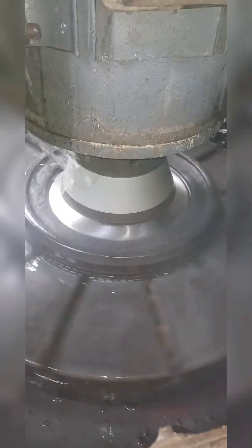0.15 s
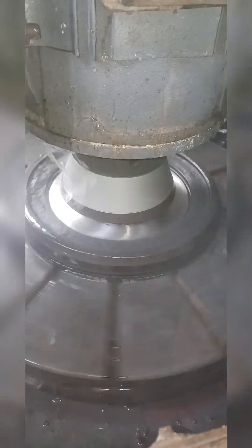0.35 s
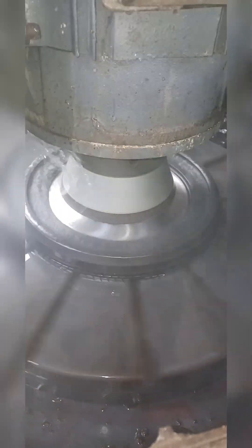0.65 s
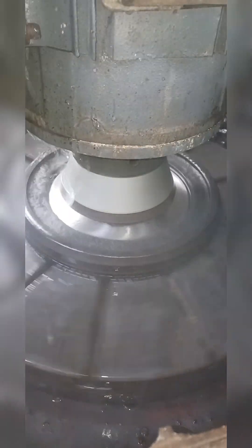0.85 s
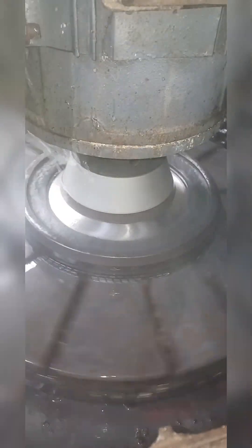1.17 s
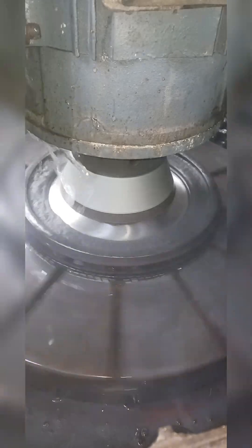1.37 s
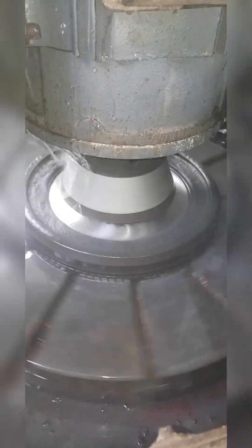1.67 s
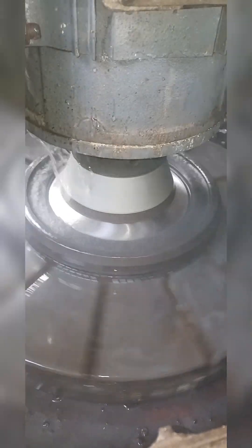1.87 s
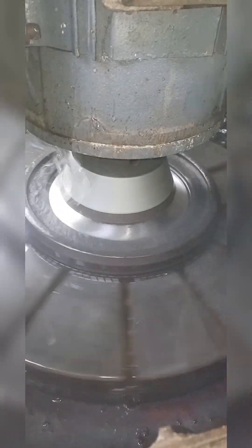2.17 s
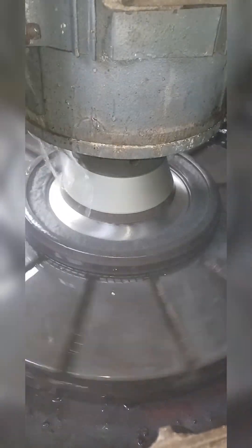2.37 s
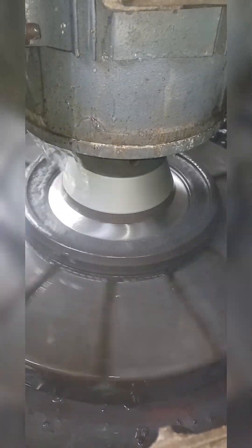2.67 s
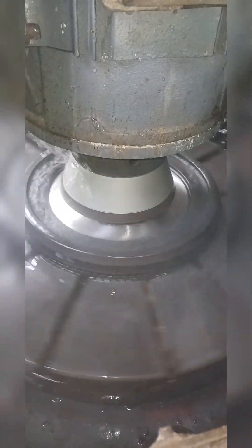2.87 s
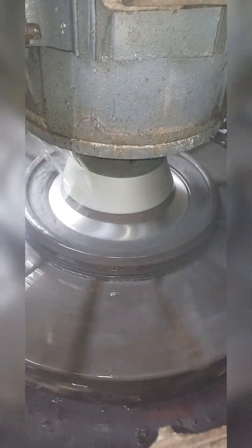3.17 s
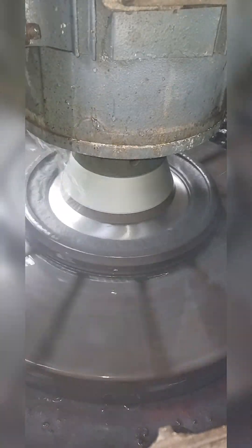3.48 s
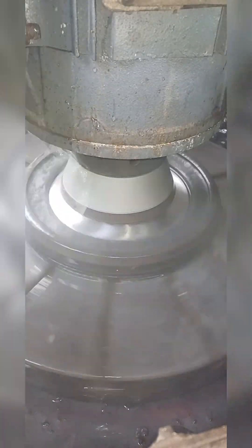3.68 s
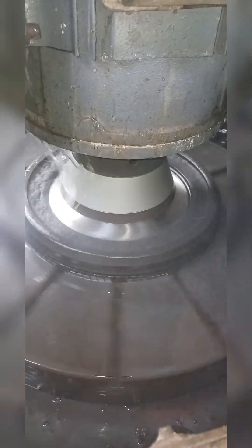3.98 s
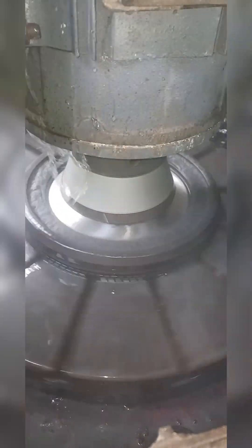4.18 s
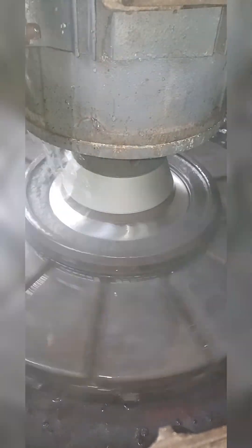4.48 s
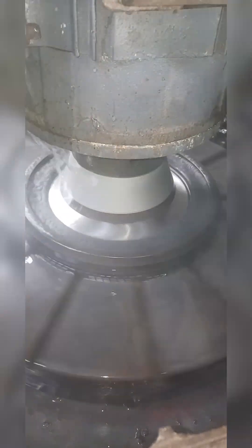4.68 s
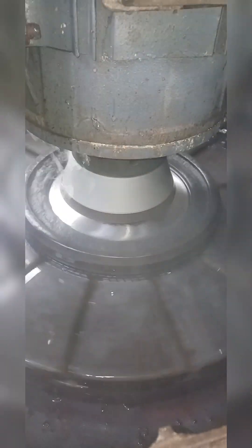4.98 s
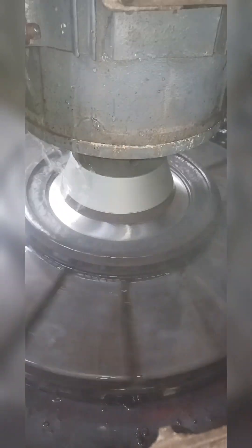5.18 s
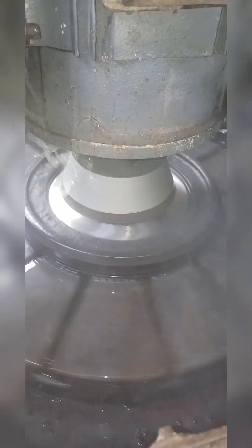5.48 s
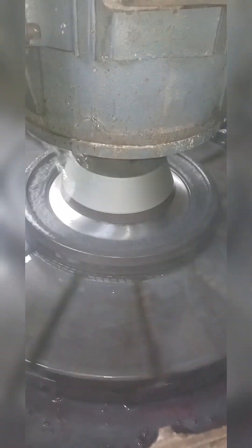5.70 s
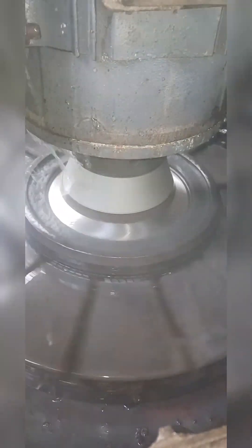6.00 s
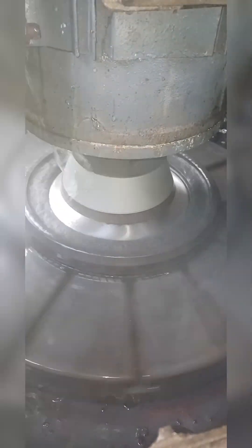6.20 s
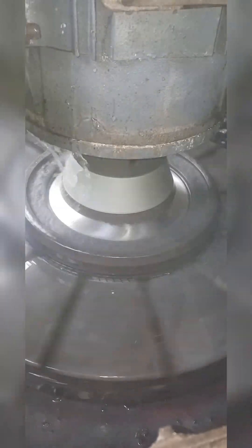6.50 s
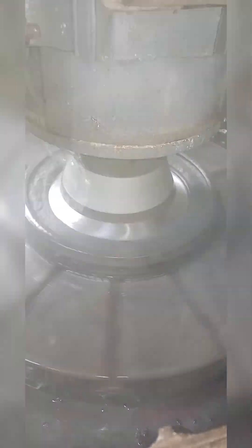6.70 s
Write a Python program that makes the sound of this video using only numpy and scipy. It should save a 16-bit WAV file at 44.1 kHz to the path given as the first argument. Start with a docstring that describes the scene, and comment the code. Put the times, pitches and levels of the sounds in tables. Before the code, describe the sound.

A grinding wheel squeals piercingly against a slowly turning metal flywheel, its high ring swelling every 0.7 seconds over wet rasping, rattle and motor thrum.

```python
"""A squealing cup wheel on a fast spindle wet-grinds a flywheel that turns slowly under it.
The wheel rings near 7 kHz: a pure swell once per table turn, a higher fluttering ring in between,
with hard bursts where it catches. Noise shaped by the bite makes the rasp, hiss and spray of wet iron.
A repeating noise pattern rattles the spindle head's resonances, and low spindle tones make the
motor's throbbing thrum."""
import sys
import numpy as np
from scipy import signal
from scipy.fft import rfft, irfft, next_fast_len
from scipy.io import wavfile
from scipy.ndimage import uniform_filter1d, map_coordinates

SR = 44100
rng = np.random.default_rng(int(sys.argv[2]) if len(sys.argv) > 2 else 0)


def wrap_up_sound(samples):
    """Save the sound to the file named by the first command line argument, as 16-bit audio."""
    columns = np.atleast_2d(samples).T
    # keep every value between -1 and 1, then stretch to whole-number steps
    tamed = np.clip(columns, -1, 1)
    steps = np.round(tamed * 32767).astype(np.int16)
    wavfile.write(sys.argv[1], SR, steps)


N = 302085  # length [samples]
SPIN_HZ = 59.1  # spindle turns per second
FREE_HZ = 7112  # the squeal's note under a light contact
SAG_HZ = 137.8  # how far the high spot pulls that note down

# the wheel's resonances: (centre [Hz], half-width [Hz], level [dB])
WHEEL = [(6985, 85, 0), (7145, 25, -17), (7415, 35, -13)]


def amp(db):
    """Turns decibels into gain."""
    return 10 ** (np.asarray(db) / 20)


def unit(x):
    """Scales a signal to rms 1."""
    return x / np.sqrt(np.mean(np.abs(x) ** 2) + 1e-20)


def along(points, hz):
    """Reads a value off (frequency, value) points joined on a log frequency axis."""
    f, v = np.transpose(points)
    return np.interp(np.log(hz + 1), np.log(f + 1), v)


def wobble(rate):
    """Draws a random curve through this many random points a second."""
    at = np.arange(0, N + 32, 32) / SR
    knots = rng.standard_normal(4096)
    return np.interp(np.arange(N) / SR, at, map_coordinates(knots, [at * rate], mode="wrap"))


def drift(rate):
    """Draws a wandering strength and phase as one complex curve of rms 1."""
    return unit(wobble(rate) + 1j * wobble(rate))


def swell(centre_s, half_s):
    """Draws a bell-shaped rise to 1 and back; at half_s from the centre it is down to 1/e."""
    return np.exp(-((np.arange(N) / SR - centre_s) / half_s) ** 2)


def filtered(x, response):
    """Multiplies the spectrum of x by a response of frequency."""
    m = next_fast_len(N + SR // 4)
    return irfft(rfft(x, m) * response(np.fft.rfftfreq(m, 1 / SR)), m)[..., :N]


def pan(db):
    """Gives left and right gains whose levels differ by db."""
    return amp([[db / 2], [-db / 2]])


def spread(pair, colour):
    """Mixes two unrelated noises into coloured stereo of rms 1."""
    # how alike left and right are: (frequency [Hz], correlation [0 to 1])
    likeness = [(40, 0.0061), (130, 0), (300, 0.065), (1000, 0.032), (3500, 0.1), (5000, 0), (14000, 0.043)]

    def mix(hz):
        turn = np.arccos(np.clip(along(likeness, hz), -1, 1)) / 2
        return colour(hz) * np.array([np.cos(turn), np.sin(turn)])

    mid, side = filtered(pair, mix)
    return unit(np.array([mid + side, mid - side]))


def contact():
    """The warped flywheel presses twice a turn, pulling the note down; in between, the head rattles."""
    # turns of the table: (high spot meets the wheel [s], its bite [dB], bite of the far side [dB],
    # lead of the rattle before it [s], that rattle [dB], rattle after the high spot [dB])
    turns = [(0.097, 5, 5, 0.057, 8.5, 7.5), (0.773, 9, 3, 0.12, 7.5, 6), (1.456, 9, 8, 0.14, 7.5, 7),
             (2.13, 9.5, 6, 0.15, 9.5, 5.5), (2.838, 10, 5, 0.14, 9, 5.5), (3.501, 9, 7, 0.12, 11, 5),
             (4.167, 9.5, 4, 0.15, 7.5, 2.5), (4.881, 9.5, 3, 0.12, 7.5, 4.5), (5.541, 11.5, 4, 0.13, 9, 7),
             (6.223, 10.5, 4, 0.12, 8.5, 7.5), (6.92, 7.5, 5.5, 0.17, 8.5, 22.5)]
    bite_db, rattle_db, note_hz = 2.15 * wobble(22), 0.6 * wobble(21), FREE_HZ
    # the far side passes after the high spot, so these times are lags
    far_lag_s, run_out_lag_s, rebound_lag_s = 0.38, 0.19, 0.38
    far_sag_hz, rebound_hz = 43.9, 66.53
    damping_db = 2.0  # the high spot quiets the rattle
    lift_share = 0.15
    for s, high_db, far_db, lead_s, before_db, after_db in turns:
        high_spot = swell(s, 0.088)
        far_side = swell(s + far_lag_s, 0.11)
        run_in = swell(s - lead_s, 0.081)
        run_out = swell(s + run_out_lag_s, 0.21)
        sag = swell(s - 0.016, 0.062)
        rebound = swell(s + rebound_lag_s, 0.033)  # the far side lets go
        bite_db = bite_db + high_db * high_spot + far_db * far_side
        rattle_db = rattle_db + before_db * run_in + after_db * run_out - damping_db * high_spot
        note_hz = note_hz - SAG_HZ * sag - far_sag_hz * far_side + rebound_hz * rebound
    # a rattling wheel loses some of its bite
    return bite_db - lift_share * rattle_db, rattle_db, note_hz


def motor(turn, bite_db):
    """The frame thrums on the spindle's low orders, each unsteady, and throbs a few times a second."""
    # strength of spindle orders 1, 2, ..: (relative level [dB])
    order_levels = [-31, -3.5, -6.5, 2, -6, -6, -12.5, -9.5, -11]
    # stereo place of the thrum: (frequency [Hz], left minus right [dB])
    hum_side = [(120, 2), (240, -1.5)]
    # the hardest surges of the thrum: (time [s], level [dB])
    surges = [(.23, -37.5), (.41, -42), (.56, -41.5), (1.05, -38), (1.201, -38), (1.33, -41), (1.67, -38.5),
              (1.82, -40.5), (1.98, -41), (2.281, -40), (2.52, -44), (2.85, -42.5), (2.95, -39),
              (5.55, -46), (6.021, -41.5), (6.361, -39), (6.66, -42.5), (6.77, -41.5)]
    # colour of the low rumble: (frequency [Hz], relative level [dB per Hz])
    rumble_colour = [(25, -35.5), (60, -21.5), (130, 2.5), (450, -0.5), (900, -19), (1800, -31.5)]
    idle_db, throb_db, throb_hz, throb_peak_s = -46.5, 1.05, 6.39, 0.105
    load_share = 0.17  # dB of thrum per dB of bite
    rumble_db, rumble_share = -48.0, 0.47  # level at idle, and how far it follows the thrum

    t = np.arange(N) / SR
    throb = np.cos(2 * np.pi * throb_hz * (t - throb_peak_s))
    level = amp(idle_db + throb_db * throb + load_share * bite_db)
    for s, db in surges:
        level = np.maximum(level, amp(db) * swell(s, 0.062))
    # the changing load makes the thrum waver
    hum, angle = 0, turn + .27 * wobble(11)
    for order, db in enumerate(order_levels, 1):
        slow_and_fast = np.array([drift(10), drift(24)])  # left, right
        swing = .55 * np.exp(2j * wobble(14)) + .85 * drift(17) + .6 * slow_and_fast
        start = rng.uniform(0, 2 * np.pi)
        tone = (swing * np.exp(1j * order * (angle + start))).real
        hum = hum + amp(db + 2.7 * wobble(9)) * pan(along(hum_side, order * SPIN_HZ)) * tone
    rumble = spread(rng.standard_normal((2, N)), lambda hz: amp(along(rumble_colour, hz)))
    rumble_gain = amp(rumble_db) * (level / amp(idle_db)) ** rumble_share
    return level * unit(hum) + rumble_gain * rumble


def buzz(turn, rattle_db):
    """The same patch of wheel comes round each turn and rattles the spindle head's resonances."""
    # the spindle head: (centre [Hz], width [Hz], relative level [dB], share of the rattle's swells)
    resonances = [(2006, 48, -7, .4), (3220, 520, -8, .7), (3515, 85, 3, 1.1), (3730, 150, -8, .8),
                  (3955, 45, 3.5, .8), (4311, 45, -4, 1.2), (4805, 95, 1, .35), (5668, 55, -.5, .45)]
    buzz_db = -43.5  # level with no rattle
    # a noise pattern fixed round the rim
    rim = unit(irfft(np.exp(2j * np.pi * rng.random((2, 513)))))
    # the contact point wanders a little along the rim
    turns_done = (turn + 0.027 * wobble(16)) / (2 * np.pi)
    place = (turns_done % 1 * rim.shape[1]).astype(int)
    # fresh noise, strongest once per turn, keeps the turns from being identical
    fresh = 0.39 * rng.standard_normal((2, N)) * np.exp(np.cos(turn + 3.2))
    mid, side = rim[:, place] + fresh
    drive = np.array([mid + side, mid - side])

    head = 0
    for k, (hz, width, db, share) in enumerate(resonances):
        def mode(centre):
            def response(f):
                damping = 1j * f * width
                peak = (-1) ** k * damping / (centre * centre - f * f + damping)
                return peak / (1 + (f / 7000) ** 12)  # treble roll-off
            return filtered(drive, response)
        # each resonance wanders a little, and flares and fades on its own
        shift = .5 + .5 * np.tanh(1.5 * wobble(11))
        moving = (1 - shift) * mode(hz - width / 4) + shift * mode(hz + width / 4)
        head = head + amp(db + share * rattle_db + 1.9 * wobble(9)) * moving
    head = unit(head) * np.sqrt(np.mean(amp(rattle_db) ** 2))
    # a slight swing once per spindle turn, and a stronger uneven flicker
    swing_db = 0.2 * np.cos(turn + 2.9 + 1.7 * wobble(7))
    chop = unit(amp(swing_db + 2.06 * wobble(150)))
    return amp(buzz_db) * chop * head * pan(3)


def patchy(depth_db):
    """Makes two noises whose colour shifts at random in short patches."""
    z = signal.stft(rng.standard_normal((2, N)), nperseg=512)[2]
    field = rng.standard_normal(z.shape[1:])
    field = uniform_filter1d(field, size=7, axis=0)  # blur across frequency
    field = uniform_filter1d(field, size=12, axis=1)  # blur across time
    return signal.istft(z * amp(depth_db * unit(field)), nperseg=512)[1][:, :N]


def rasp(turn, bite_db):
    """Grit scratches the iron in tiny bursts, pulsing with spindle and belt, hisses and flings coolant."""
    # colours of the three noises: (frequency [Hz], relative level [dB per Hz])
    grit_colour = [(250, -3.5), (680, 0), (800, -5), (1200, -3), (2000, -4.5), (2700, -6), (4000, -7),
                   (6000, -21), (7500, -20), (9000, -53)]
    hiss_colour = [(2500, -20.5), (4000, -10), (5500, -4), (6300, 1), (6700, 13.5), (7400, -1),
                   (8200, -16.5), (9000, -63.5)]
    spray_colour = [(8000, -20), (11200, -15), (12000, 10), (13600, 16), (14200, 17), (14600, -6),
                    (15200, -20)]
    # coarser scrapes: (time [s], half-length [s], rise over the usual rasp [dB])
    scrapes = [(0.425, 0.1, 5.5), (1.47, 0.032, 1.5), (2.851, 0.03, 1.6), (5.539, 0.016, 2.5),
               (6.596, 0.032, 3.5)]
    rasp_db, hiss_db = -43.5, -34.5  # levels with no bite, before the easing
    spray_db = -59  # average level
    load_db, full_bite_db = 8.5, 13.0  # most the bite can add, and the bite where it levels off
    ease_db_per_s, hiss_share, belt_hz = 0.0638, 0.72, 43

    t = np.arange(N) / SR
    # the scratching grows with the bite up to a limit and slowly eases
    work_db = load_db * np.tanh(bite_db / full_bite_db) - ease_db_per_s * t
    work_db = work_db + sum(db * swell(s, half_s) for s, half_s, db in scrapes)
    belt = np.cos(2 * np.pi * belt_hz * t)
    bite = unit(amp(0.3 * np.cos(turn) + 1.7 * belt + 2.0 * wobble(450)))
    grit = spread(bite * patchy(1.5), lambda hz: amp(along(grit_colour, hz)))
    hiss = spread(bite * rng.standard_normal((2, N)), lambda hz: amp(along(hiss_colour, hz)))
    spray = spread(bite * rng.standard_normal((2, N)), lambda hz: amp(along(spray_colour, hz)))
    # the hiss follows the load only in part; spray grows faster than the scratching
    scratching = amp(rasp_db + work_db) * grit
    hissing = amp(hiss_db + hiss_share * work_db) * hiss * pan(0.43)
    return scratching + hissing + amp(spray_db) * unit(amp(2 * work_db)) * spray


def bursts():
    """A caught wheel gives one burst per spindle turn until it lets go: rows (time [s], level [dB])."""
    # the wheel catches: (first burst [s], last burst [s], level before unevenness and burst gain [dB])
    catches = [(0.139, 0.173, -11), (0.406, 0.405, -13), (0.419, 0.471, -8.5), (0.676, 0.676, -10),
               (0.828, 0.861, -11.5), (1.07, 1.139, -11), (1.21, 1.294, -11.5), (1.509, 1.562, -11),
               (1.743, 1.827, -10.1), (1.844, 1.861, -10), (2.047, 2.048, -10.5), (2.189, 2.189, -7.8),
               (2.297, 2.332, -13), (2.465, 2.482, -12.5), (2.492, 2.513, -8), (2.706, 2.724, -9),
               (2.889, 2.938, -11), (2.972, 3.041, -13), (3.149, 3.214, -10), (3.565, 3.58, -9),
               (3.815, 3.816, -9.5), (3.864, 3.863, -7), (3.953, 4.007, -14), (4.035, 4.069, -12),
               (4.235, 4.234, -7), (4.249, 4.266, -9.5), (4.286, 4.304, -12), (4.332, 4.399, -11),
               (4.487, 4.569, -10), (4.922, 4.939, -8.5), (4.963, 5.054, -10.5), (5.168, 5.18, -11),
               (5.198, 5.214, -7.8), (5.252, 5.269, -10), (5.381, 5.446, -13), (5.611, 5.677, -11),
               (5.715, 5.732, -13), (5.875, 5.892, -10), (5.904, 5.94, -9.5), (6.066, 6.114, -11),
               (6.295, 6.295, -7.5), (6.398, 6.464, -12.5), (6.535, 6.55, -9.5), (6.592, 6.608, -9)]
    rows = []
    for first, last, db in catches:
        for s in np.linspace(first, last, 1 + round((last - first) * SPIN_HZ)):
            rows.append((s, db + rng.standard_normal()))
    return np.array(rows)


def catch(swing, phase, hits):
    """Each burst stalls the steady ring and kicks the wheel's main resonance, which dies at once."""
    rise_s, fall_s, burst_gain_db = 0.0019, 0.0026, 1.5
    stall_db, stall_s = -1, 0.0067  # the ring's drop round a burst, and its half-length
    out, kicks = swing.copy(), np.zeros_like(swing)
    stall = np.zeros(N)
    for s, db in hits:
        at = round(s * SR)
        near = np.arange(max(at - SR // 40, 0), min(at + SR // 40, N))
        u = near / SR - s
        shape = np.exp(-(u / np.where(u < 0, rise_s, fall_s)) ** 2)
        stall[near] = np.maximum(stall[near], np.exp(-((u + rise_s) / stall_s) ** 4))
        out[:, near] *= 1 - shape
        # the caller multiplies by the squeal's note, so its phase is taken out here
        kick_phase = 2 * np.pi * WHEEL[0][0] * u + phase[at] - phase[near]
        kicks[:, near] += amp(db + burst_gain_db) * shape * np.exp(1j * kick_phase)
    return out * amp(stall_db * stall) + kicks


def squeal(turn, bite_db, note_hz):
    """The wheel rings; away from its resonance the note breaks into one burst per spindle turn."""
    # tones the spinning wheel splits off: (spindle orders from the note, relative level [dB])
    flutter = [(-5, -13), (-4, -12), (-3, -8), (-2, -4), (-1, -5.5), (1, -4.5), (2, -11), (3, -17),
               (4, -18), (5, -15)]
    # the wheel slips and its squeal drops away: (time [s], half-length [s], change in drive [dB])
    slips = [(0.212, 0.031, -3.5), (0.647, 0.017, -6.5), (1.01, 0.011, -5), (2.019, 0.01, -5),
             (2.258, 0.025, -4.5), (2.416, 0.017, -4.5), (3.044, 0.027, -2), (2.944, 0.018, -4.5),
             (4.457, 0.034, -5.5), (4.793, 0.011, -17), (5.69, 0.0041, -17.5), (5.788, 0.019, -9.5)]
    # the sound reaches the two ports out of step: (frequency [Hz], left lead [radians])
    port_phase = [(6900, -1), (7020, .4), (7085, 2.7), (7140, 4.6), (7250, 5)]
    squeal_db = -20.5  # drive with no bite
    lock_db, lock_range_db = 10, 7  # bite where the tone is pure, and the range over which it locks in
    locked_flutter_db, loose_flutter_db = -13.5, -2  # strength of the side tones
    growl_orders, growl_db, growl_fall_db = range(-13, -3), -12, 0.75  # fall per order downward
    overtone_db, swing_limit = -32.5, .41

    level_db = squeal_db + bite_db + sum(db * swell(s, half_s) for s, half_s, db in slips)
    # a strong swell locks into a pure tone, a light contact flutters
    loose = np.clip((lock_db - bite_db) / lock_range_db, 0, 1)
    depth = amp(locked_flutter_db * (1 - loose) + loose_flutter_db * loose)
    # a light contact lets the note wander
    note_hz = note_hz + 16 * loose * wobble(14)
    phase = 2 * np.pi * np.cumsum(note_hz + 5 * wobble(82)) / SR
    note = np.exp(1j * phase)

    # the wheel's own resonances favour the nearest tones
    def wheel(hz):
        return sum(amp(db) / (1 + 1j * (hz - c) / w) for c, w, db in WHEEL)

    # the vibration pattern creeps round the rim, keeping step with the catches
    hits = bursts()
    t, catch_s = np.arange(N) / SR, np.sort(hits[:, 0]) - .0015
    catch_turn = np.unwrap(np.interp(catch_s, t, turn))
    angle = turn - np.interp(t, catch_s, catch_turn)
    ring = wheel(note_hz)
    for order, db in flutter:
        # reflections reach each microphone port with their own shifting phase
        paths = 1 + .4 * drift(16) + .45 * np.array([drift(12), drift(12)])
        strength = depth * amp(db) * wheel(note_hz + order * SPIN_HZ)
        ring = ring + strength * paths * np.exp(1j * order * angle)
    # under full load a ladder of lower tones roughens the note
    growl = 0
    for order in growl_orders:
        step_db = growl_db + growl_fall_db * (order - growl_orders[-1])
        strength = amp(step_db) * wheel(FREE_HZ - SAG_HZ + order * SPIN_HZ)
        growl = growl + strength * drift(7.8) * np.exp(1j * order * turn)
    ring = ring + (1 - loose) * growl
    # the contact sets the energy of each turn, so level it over about two turns
    ring /= np.sqrt(uniform_filter1d(np.mean(np.abs(ring) ** 2, axis=0), size=1500))
    # single grits shake the note and make the bursts uneven
    ring = ring * (1 + .22 * loose * drift(220)) * amp(1.2 * loose * wobble(40))
    ring = ring + .03 * np.array([drift(800), drift(800)])
    swing = np.sqrt(2) * amp(level_db) * ring
    # friction can only feed the vibration up to a limit
    swing /= (1 + (np.abs(swing) / swing_limit) ** 4) ** (1 / 4)
    swing = catch(swing, phase, hits) * (1 + .06 * np.array([drift(260), drift(260)]))

    sides = np.array([[1], [-1]])
    ports = filtered((swing * note).real, lambda hz: np.exp(.5j * along(port_phase, hz) * sides))
    # the octave is a faint, grainy ring
    grain = .5 * np.array([drift(30), drift(30)]) + .85 * np.array([drift(400), drift(400)])
    strength = np.abs(swing) ** .5 * amp(level_db / 2)
    octave = (np.exp(2j * (phase + np.angle(swing))) * grain).real
    return (ports + amp(overtone_db) * strength * octave) * pan(1.2)


def scene():
    """Everything follows the spindle's angle and the wheel's contact with the flywheel."""
    turn = 2 * np.pi * np.cumsum(SPIN_HZ + .05 * wobble(4)) / SR
    bite_db, rattle_db, note_hz = contact()
    background = motor(turn, bite_db) + buzz(turn, rattle_db)
    return background + rasp(turn, bite_db) + squeal(turn, bite_db, note_hz)


def record(dry):
    """The microphone sheds deep bass below about 72 Hz; nothing is kept above the band limit."""
    top_hz = 15400
    return filtered(dry, lambda hz: (hz < top_hz) * hz ** 2 / np.sqrt(hz ** 4 + 72 ** 4))


dry = scene()
out = record(dry)
wrap_up_sound(out)
```